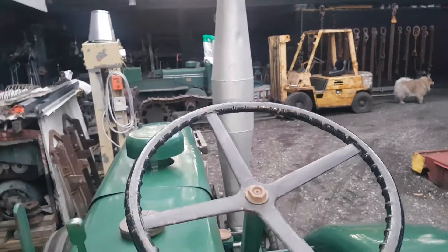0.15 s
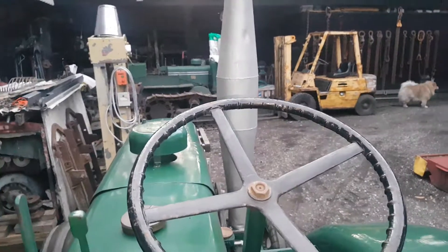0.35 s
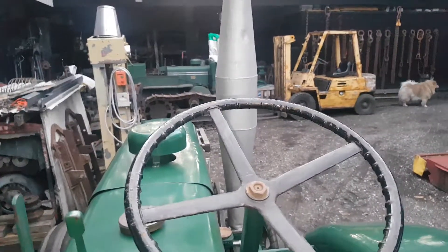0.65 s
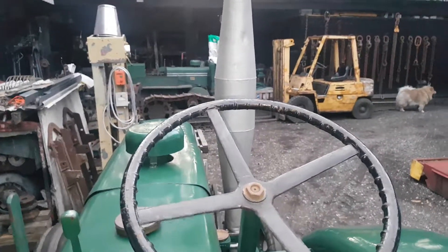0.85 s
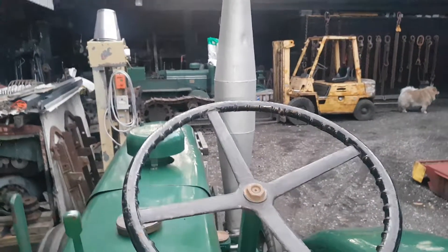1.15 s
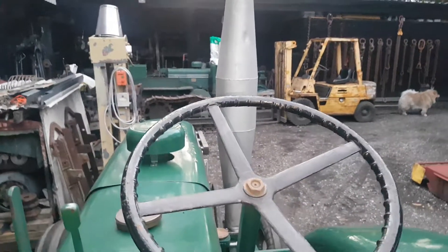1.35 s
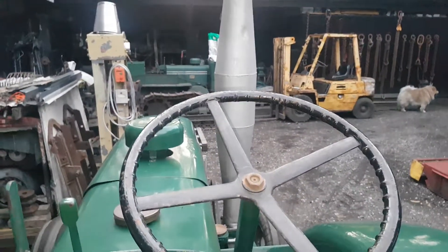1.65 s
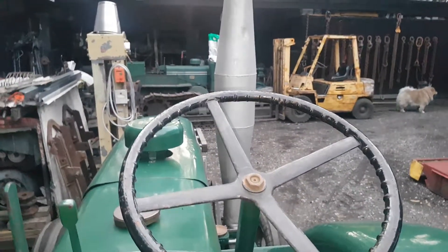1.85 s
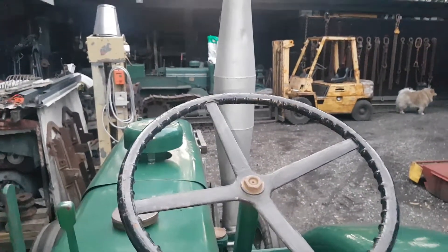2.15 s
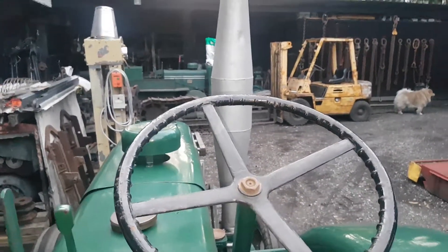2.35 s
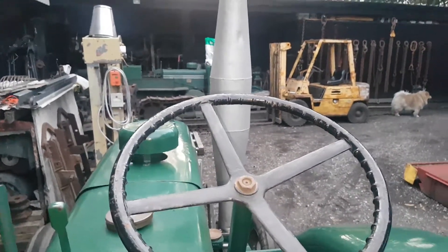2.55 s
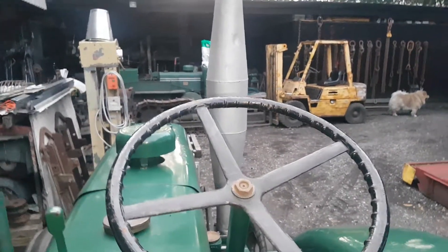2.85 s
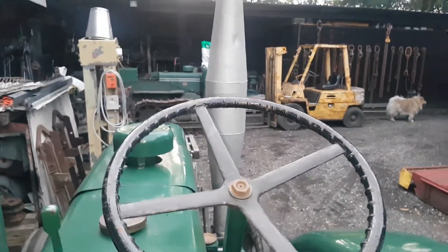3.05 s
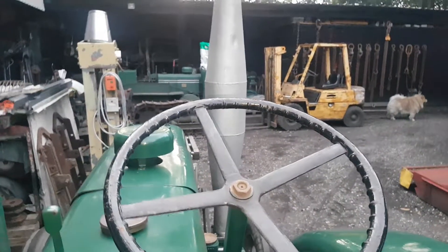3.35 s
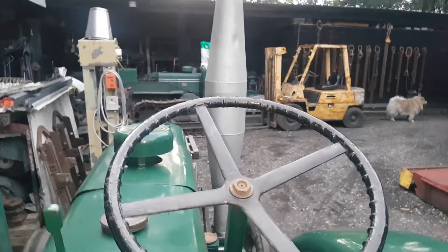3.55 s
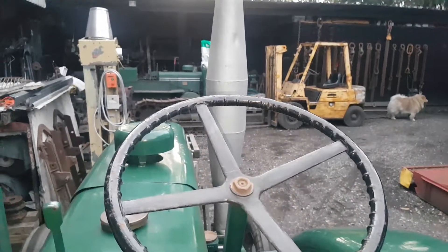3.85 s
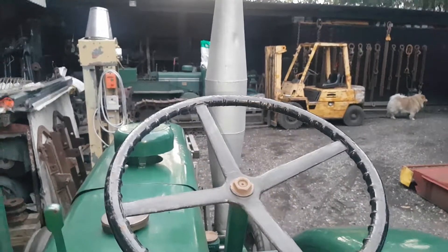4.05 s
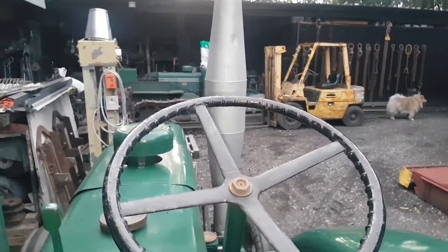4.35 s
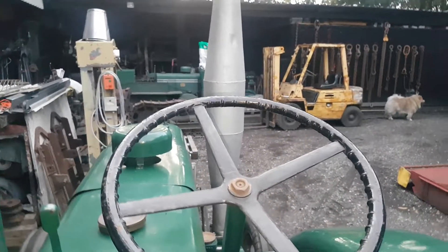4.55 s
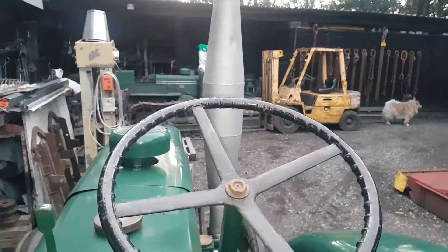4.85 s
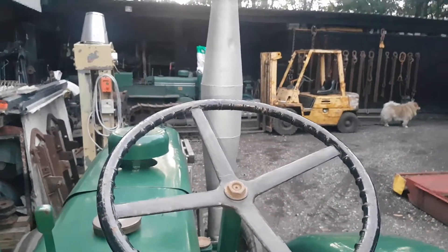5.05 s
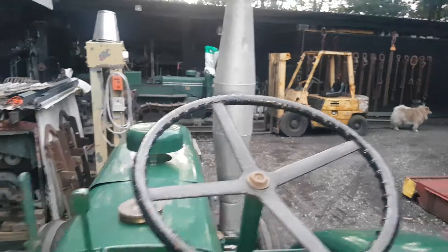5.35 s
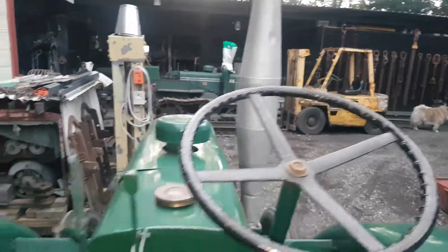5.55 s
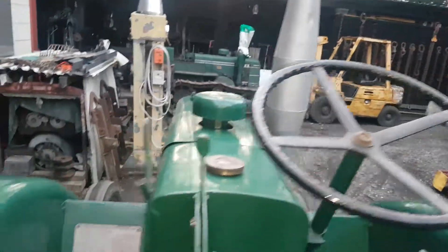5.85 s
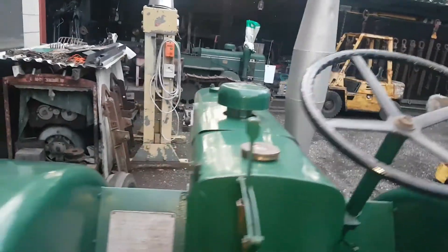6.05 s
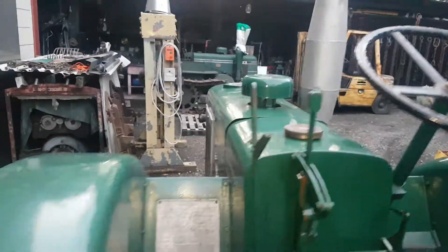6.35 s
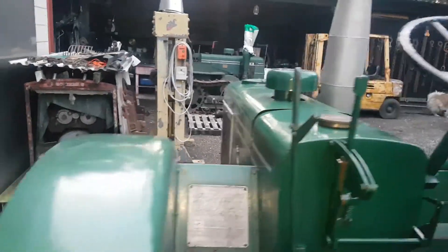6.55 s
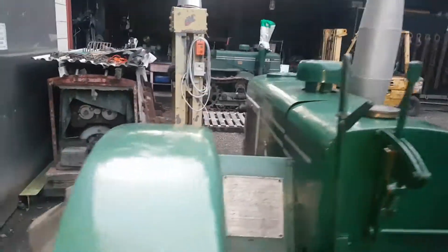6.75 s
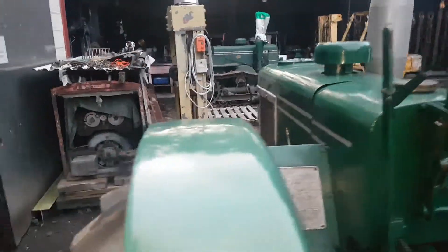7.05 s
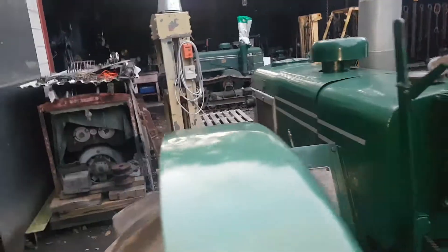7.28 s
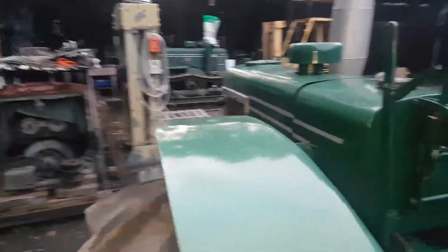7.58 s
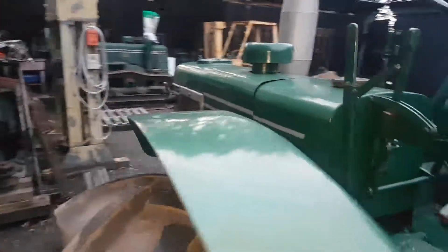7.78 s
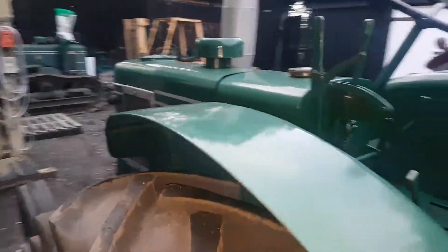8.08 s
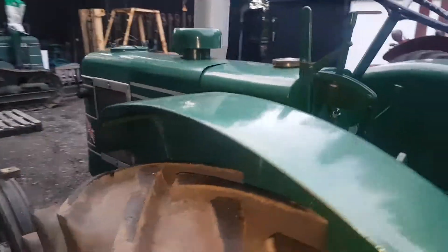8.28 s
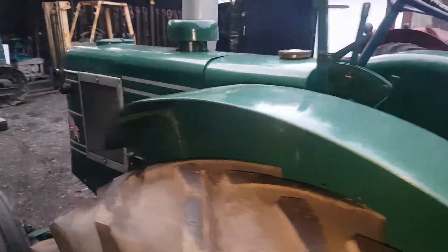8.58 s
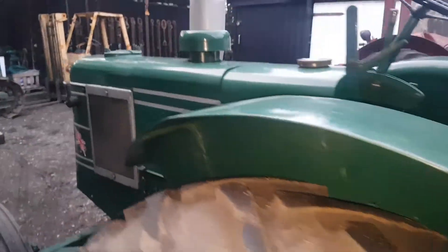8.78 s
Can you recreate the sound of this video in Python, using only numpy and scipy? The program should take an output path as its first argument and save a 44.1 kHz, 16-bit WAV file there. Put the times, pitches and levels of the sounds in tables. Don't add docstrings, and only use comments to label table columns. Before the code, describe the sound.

From 0 to 9 seconds a single-cylinder diesel tractor runs at a brisk steady tick-over, already going at the start and still going at the end. Roughly 8 thumps a second, quickening very slightly, leave the exhaust stack as deep, hollow pulses around 100 to 300 Hz. Just before each thump, valve gear knocks and chatters, a tiny whistle chirps near 1 kHz, and turbulent gas puffs with bright hiss; a thin, high squeak comes and goes. Until about 5.5 seconds the view from the seat is constant, with small tinny ticks near 1 and 2.9. From 5.5 to 8 the listener moves to the rear wheel: the thump loses weight, the whistle dims, level and colour waver. From 8 to 9, beside the wheel, rush and clatter are rougher, with short sheet-metal buzzes. Close small stereo microphone, slightly overloaded, brighter right, in a yard.

```python
import sys
import numpy as np
from scipy import signal
from scipy.fft import rfft, irfft, next_fast_len
from scipy.io import wavfile
from scipy.ndimage import uniform_filter1d

SR = 44100
rng = np.random.default_rng(int(sys.argv[2]) if len(sys.argv) > 2 else 0)


def how_loud(loudness_db):
    steps = np.asarray(loudness_db, float) / 20
    return 10 ** steps


def digitize_waveform(pressure):
    field = np.atleast_2d(pressure).T
    bounded = np.clip(field, -1, 1)
    quanta = np.round(bounded * 32767).astype(np.int16)
    wavfile.write(sys.argv[1], SR, quanta)


N = 393372

# f/Hz, density/(dB per Hz)
RUSH_SPECTRUM = [(150, -13.5), (300, -9.5), (500, -18), (800, -19.5), (1150, -20.5), (1400, -26),
                 (2500, -35.5), (2950, -38.5), (4600, -41.5), (5300, -46), (7500, -44), (9000, -61),
                 (10500, -58), (15500, -52)]
# f/Hz, gain/dB
WHEEL_COLOUR = [(200, 0.5), (300, 0.2), (550, -3), (1100, 7.5), (1500, -1.3), (2400, 1.7), (3500, -1.5),
                (5500, 2.5), (8500, -2.2), (13000, 1.5)]
# start/cycle from the thump, decay/cycle, peak/dB, centre f/Hz, reach/octave
GAS_GUSTS = [(-.42, .1, 1.5, 550, 0.88), (-.34, .12, 5.5, 1480, 1.3), (-.2, 0.045, 5, 4000, 5.1),
             (-.13, 0.13, 9, 250, 0.93), (-.43, 0.17, 2, 12100, 1.1), (.09, 0.18, 4, 298, 2.1),
             (.1, .06, 2.5, 3300, 0.72), (.41, 0.036, -1, 10500, 0.51)]
VALVE_OPEN_DB = 4
FIRING_HZ = 8.27
LOCKED_UP_TO = 17


def in_time(rows):
    s, *columns = np.transpose(rows)
    return [np.interp(np.arange(N) / SR, s, c) for c in columns]


def at_hz(points, hz):
    return np.interp(np.log(hz), np.log(np.array(points)[:, 0]), np.array(points)[:, 1])


def drift(rate):
    r = np.exp(-80 * np.pi * rate / SR)
    slow = signal.lfilter([1], [1, -2 * r, r * r], rng.standard_normal(N // 40 + 4002))[4000:]
    return np.interp(np.arange(N) / 40, np.arange(len(slow)), slow / slow.std())


def shaped(x, gain):
    pad = 8192
    size = next_fast_len(N + 2 * pad)
    wide = np.pad(x, [(0, 0)] * (x.ndim - 1) + [(pad, pad)], mode="reflect")
    response = gain(np.maximum(np.fft.rfftfreq(size, 1 / SR), 1))
    return irfft(rfft(wide, size) * response, size)[..., pad:pad + N]


def swell(turn, hz, gusts, open_db=0):
    valve_opens, open_for, attack = -0.45, 0.65, .025
    share = np.arange(256) / 256
    opened = (share - valve_opens) % 1
    db = open_db * (1 - np.exp(-opened / attack)) * np.exp(-(opened / open_for) ** 8)
    db = db / (1 + (350 / hz) ** 4)
    for start, decay, peak_db, centre_hz, octaves in gusts:
        age = (share - start) % 1
        distance = np.log2(hz / centre_hz) / octaves
        db = db + peak_db * (1 - np.exp(-age / attack)) * np.exp(-age / decay - distance ** 2)
    return np.interp(turn % 1, share, db - db.mean(), period=1)


def squeak(turn, way):
    squeak_hz, squeak_db, scatter_db = 11000, -57.5, 4.5
    squeak_at, length = -0.38, .14
    band = signal.butter(2, [.965 * squeak_hz, 1.035 * squeak_hz], "band", fs=SR, output="sos")
    hiss = signal.sosfilt(band, rng.standard_normal((2, N)))
    place = turn - squeak_at + .5
    each_db = scatter_db * rng.standard_normal(80)[np.floor(place + 1).astype(int)]
    stroke = np.exp(-((place % 1 - .5) / length) ** 2)
    return how_loud(squeak_db + each_db - 18 * np.clip(way, 0, 1)) * stroke * hiss / hiss.std()


def tinwork():
    # t/s, peak level/dB, f/Hz, length/s
    rattles = [(.955, -46, 8200, .012), (2.852, -34, 4900, .013), (2.85, -45, 7400, .013),
               (6.23, -37, 3600, .004), (6.46, -41, 3600, .005), (7.886, -38, 4500, .005),
               (6.9, -39, 4200, .008), (6.94, -39, 4200, .008), (8.425, -30, 2400, .011),
               (8.545, -31, 2400, .009), (8.54, -45, 6600, .009), (8.78, -41, 5200, .015),
               (8.886, -40, 6200, .012), (8.902, -34, 2900, .009)]
    out, t = np.zeros((2, N)), np.arange(N) / SR
    for s, db, hz, length in rattles:
        band = signal.butter(2, [0.94 * hz, 1.07 * hz], "band", fs=SR, output="sos")
        buzz = signal.sosfilt(band, rng.standard_normal((2, N)))
        out += how_loud(db) * buzz / buzz.std() * np.exp(-((t - s) / length) ** 2)
    return out


def clatter(turn, level_db, way, per_s=900, cycles=45, depth=1.7):
    out = np.zeros((2, N))
    busy = how_loud(depth * swell(turn, 2000, GAS_GUSTS, VALVE_OPEN_DB))
    born = (rng.random(N) < per_s * busy / SR) * how_loud(5.7 * np.minimum(rng.exponential(1, N), 3))
    born = born * rng.choice([-1, 1], N)
    pitches, dealt = np.geomspace(1100, 7600, 26), rng.integers(0, 26, N)
    sides = how_loud(2 * rng.standard_normal((2, N)))
    for k, hz in enumerate(pitches):
        r, w = how_loud(-60 * hz / (cycles * SR)), 2 * np.pi * hz / SR
        gain = how_loud(at_hz(RUSH_SPECTRUM, hz) + at_hz(WHEEL_COLOUR, hz) * way) * np.sqrt(hz / 1000)
        strikes = sides * born * (dealt == k) + 1e-18
        out += gain * signal.lfilter([0, np.sin(w)], [1, -2 * r * np.cos(w), r * r], strikes)
    return how_loud(level_db - 36.5) * out / out.std()


def valve_gear(turn, level_db):
    # time/cycle from the thump, level/dB, brightness/(dB per octave), scatter/dB
    contacts = [(-.405, -10, -2.5, 1.8), (-.33, -15.5, 0, 1.5), (-.26, -17, 2.5, 2), (-.19, -15, 2.5, 2.5),
                (-.1, -20.5, -1, 2), (.26, -33, 5.5, 3.5)]
    # f/Hz, level/dB, t60/s
    casing_modes = [(509, -3, 0.035), (575, -6, 0.025), (782, -9, 0.061), (1214, 1.5, 0.007),
                    (1767, -21, 0.038), (2078, -15, 0.03), (2456, -16.5, 0.035), (3160, -44.5, 0.005),
                    (4930, -23, 0.0075), (7480, -28.5, 0.02)]
    out = np.zeros((2, N))
    hits = [np.flatnonzero(np.diff(np.floor(turn - row[0]))) for row in contacts]
    shifts = [rng.normal(0, .0006 * SR, len(h)).astype(int) for h in hits]
    ticks = (rng.random(N) < 140 / SR) * how_loud(-27 + 4 * np.minimum(rng.exponential(1, N), 2.5))
    for hz, mode_db, t60 in casing_modes:
        clicks = ticks * rng.standard_normal((2, N)) * (rng.random(N) < .4) + 1e-18
        for at, shift, (share, db, tilt, scatter_db) in zip(hits, shifts, contacts):
            scatter = scatter_db * rng.standard_normal((2, len(at)))
            strength = how_loud(db + tilt * np.log2(hz / 800) + scatter)
            spread = rng.integers(0, .001 * SR, len(at))
            clicks[:, np.clip(at + shift + spread, 0, N - 1)] += strength * rng.choice([-1, 1])
        r, w = how_loud(-60 / (t60 * SR)), 2 * np.pi * hz / SR
        out += signal.lfilter([0, how_loud(mode_db) * np.sin(w)], [1, -2 * r * np.cos(w), r * r], clicks)
    soft = signal.butter(4, 6500, fs=SR, output="sos")
    return signal.sosfilt(soft, out) * how_loud(level_db)


def whistle(turn, way):
    rest_hz, hz_per_firing_hz = 1018.5, 130
    whistle_db, shadow_db, lead_s = -10.7, 5.5, .0175
    firing_hz = uniform_filter1d(np.gradient(turn) * SR, size=SR)
    hz = rest_hz + hz_per_firing_hz * (firing_hz - FIRING_HZ)
    level_db = whistle_db - shadow_db * np.clip(13.5 * (way - .2), 0, 1)
    out = np.zeros(N)
    thumps = np.flatnonzero(np.diff(np.floor(turn)))
    age = np.arange(-.02 * SR, .012 * SR) / SR
    shape = np.where(age < 0, np.exp(-(age / 0.0055) ** 2), np.exp(-(age / 0.007) ** 2))
    for at, (a, b, c, d) in zip(thumps, rng.standard_normal((len(thumps), 4))):
        idx = np.clip((at + (age - lead_s - .003 + 0.001 * a) * SR).astype(int), 0, N - 1)
        phase = 2 * np.pi * (hz[at] + 9 * b) * age + np.pi * c
        out[idx] += how_loud(level_db[at] + 0.78 * d) * shape * (np.sin(phase) + 0.026 * np.cos(2 * phase))
    return out * how_loud(1.5 * drift(150))


def ringing(hz, echo_db=-21, count=14):
    # f/Hz, width/Hz, level/dB
    stack_modes = [(240.3, 14, 5.5), (310.2, 25, 4), (409, 50, 2.5), (500, 18, 6.5), (620, 22, 2.5),
                   (756, 18, 5), (969, 51, 7), (1710, 360, 4), (2100, 69, 2.5), (2293, 170, 3.5)]
    peaks_db = sum(db / (1 + ((hz - centre) * 2 / width) ** 2) for centre, width, db in stack_modes)
    lags = rng.uniform(0.001044, .022, (count, 2, 1))
    echoes = sum(np.exp(-2j * np.pi * hz * lag) * how_loud(-300 * lag) for lag in lags)
    return how_loud(peaks_db) * (1 + how_loud(echo_db) * echoes * np.clip(hz / 1500, 0, 1))


def rush(turn, way, low_db, depth=1.08, flutter_db=0.86, patchy_db=0.98):
    # f/Hz, correlation/1
    likeness = [(60, 0.39), (180, 0.91), (550, 0.75), (1650, 0.048), (4970, 0.01), (15000, 0.01)]
    # start/cycle, decay/cycle,
    # peak/dB, centre f/Hz, reach/octave
    flank_bursts = [(-.29, 0.059, 5, 2520, .7), (-.02, .12, 3, 260, .6)]
    each_cycle = rng.normal(0, 0.37, 80)[np.floor(turn + 1.45).astype(int)]
    together = uniform_filter1d(each_cycle, size=400) + flutter_db * drift(31)
    out = np.zeros((2, N))
    centres = 80 * 2 ** np.arange(0, 8, 2 / 3)
    size = next_fast_len(N)
    octave = np.log2(np.maximum(np.fft.rfftfreq(size, 1 / SR), 1))
    white = rfft(rng.standard_normal((2, 2, size)))
    for i, hz in enumerate(centres):
        window = np.cos(np.pi / 2 * np.clip((octave - np.log2(hz)) * 3 / 2, -1, 1))
        mid, side = irfft(white[i % 2] * window, size)[:, :N]
        alike = np.clip(at_hz(likeness, hz), 0, .99)
        db = (depth + 0.037 * way) * swell(turn, hz, GAS_GUSTS, VALVE_OPEN_DB)
        db = db + np.clip(way - .5, 0, 1) * swell(turn, hz, flank_bursts)
        db = db + low_db / (1 + (hz / 420) ** 4)
        db = db + way * at_hz(WHEEL_COLOUR, hz)
        gain = how_loud(db + together * min(1, hz / 700) + patchy_db * drift(18.0))
        out += gain * (np.sqrt(1 + alike) * mid + np.sqrt(1 - alike) * side * [[1], [-1]])
    out = shaped(out, lambda hz: ringing(hz) * how_loud(at_hz(RUSH_SPECTRUM, hz)) / (1 + (150 / hz) ** 4))
    return how_loud(-17.5) * out / out.std()


def exhaust_orders():
    seat_orders = [-52, -41, -39.5, -30.5, -34, -28, -23.5, -33.5, -24, -15, -24.5, -14.5, -22.5, -22.5,
                   -19.5]
    wheel_orders = [-50, -37.5, -39.5, -26, -29.5, -25.5, -28, -32.5, -26.5, -19.5, -34, -16.5, -22.5,
                    -30.5, -27]
    # f/Hz, width/Hz, level at the seat/dB, level beside the wheel/dB
    pipe_modes = [(158.8, 22, -26, -37.5), (181.6, 19.4, -25, -30.5), (206.2, 26.6, -25, -34.5),
                  (249.6, 16.5, -32, -25.5), (283, 16, -28.5, -33.5)]
    top_order = 35
    k = np.arange(LOCKED_UP_TO + 1, top_order)
    hz, width, *tops_db = np.transpose(pipe_modes)
    shape = 1 / (1 + ((k[:, None] * FIRING_HZ - hz) * 2 / width) ** 2) ** 2
    seat_db, wheel_db = [10 * np.log10(shape @ how_loud(2 * db)) for db in tops_db]
    return zip(range(3, top_order), [*seat_orders, *seat_db], [*wheel_orders, *wheel_db])


def thump(turn, level_db, way, deep_db):
    inverted, late_up_to = 16, 9
    pipe_note, lag_above_note = 14, .55
    ground_lead, ground_up_to = .8, 6
    wall_cancels = 8
    upper_crest, crest_later_beside = -0.0846, 0.0533
    out = np.zeros(N)
    for k, seat_db, wheel_db in exhaust_orders():
        loose = k > LOCKED_UP_TO
        phase = np.pi * (k == inverted) - np.pi / 2 * (k - .6) * (k <= late_up_to)
        phase -= lag_above_note * max(k - pipe_note, 0) * (not loose)
        phase += ground_lead * (k <= ground_up_to)
        phase += loose * np.pi + (.12 + .45 * loose) * drift(.3)
        crest = upper_crest + crest_later_beside * way if loose else -.02
        order_db = seat_db + way * (wheel_db - seat_db)
        gain = how_loud(order_db + (.7 + 1.5 * loose) * drift(.8) + .9 * drift(3))
        gain = gain * how_loud(deep_db * (k <= late_up_to))
        if k == wall_cancels:
            gain = gain * np.cos(np.pi * way)
        out -= gain * np.cos(2 * np.pi * k * (turn - crest) + phase)
    return out * how_loud(level_db)


def scene():
    # t/s, thumps counted so far/1
    crank = [(-0.0041, -1.0), (1.1157, 8.0), (2.1031, 16.0), (3.0826, 24.0), (4.0543, 32.0), (5.0185, 40.0),
             (5.9755, 48.0), (6.9225, 56.0), (7.8635, 64.0), (8.8055, 72.0), (9.0408, 74.0)]
    # t/s, level/dB
    gain_ride = [(0, -1), (.5, -0.5), (1, -.5), (1.25, -2.5), (1.5, -0.8), (2.5, -0.14), (3.5, 0),
                 (4.5, -0.46), (5.5, 0.5), (5.95, -1.5), (6.3, -0.7), (6.6, -0.5), (6.95, 0.8), (7.25, 0.5),
                 (7.6, -2), (8.0, -1), (8.45, 0.5), (8.92, 1)]
    # t/s, share of the way from seat to wheel/1 (over 1 = toward the engine), extra path from the stack/m
    walk = [(0, 0.051, 0.041), (3, 0.027, .06), (5.5, 0.205, 0.11), (6.4, 0.295, 0.62), (7.2, 0.63, 1.03),
            (7.9, 0.29, 1.63), (8.2, 1.06, 1.55), (8.92, 1, 1.7)]
    left_leads_s, thump_loss_db_per_m = .00028, 1.6
    wall_wave_m, wall_swing_db = 3.1, 3
    low_rush_db_per_m = 2.5
    turn, = in_time(crank)
    level_db, = in_time(gain_ride)
    way, path_m = in_time(walk)
    late_turn = turn - path_m / 343 * np.gradient(turn) * SR
    upper = rush(late_turn, way, low_rush_db_per_m * path_m)
    upper = upper + whistle(late_turn, way) + valve_gear(late_turn, -1.6)
    upper += clatter(late_turn, -1.1, way) + tinwork() + squeak(late_turn, way)
    treble = shaped(upper[1], lambda hz: 1 / (1 + (900 / hz) ** 4))
    upper[1] += np.interp(np.arange(N) - left_leads_s * SR, np.arange(N), treble) - treble
    deep_db = -wall_swing_db * np.sin(2 * np.pi * path_m / wall_wave_m)
    deep = thump(late_turn, .3 - thump_loss_db_per_m * path_m, np.clip(way, 0, 1), deep_db)
    return how_loud(level_db) * (upper + deep)


def low_pass(x):
    return signal.sosfilt(signal.butter(12, 15620, fs=SR, output="sos"), x)


def record(dry):
    # f/Hz, left minus right/dB
    port_tilt = [(30, -5), (70, -2.75), (180, -1.34), (450, -2.5), (1000, -10), (2000, -8), (4500, -6),
                 (12000, -8.5)]
    sides = np.array([[1], [-1]])
    x = shaped(dry, lambda hz: how_loud(at_hz(port_tilt, hz) / 2 * sides) / (1 + (28 / hz) ** 4))
    x = x / (1 + (abs(x) / 1.02) ** 4) ** (1 / 4)
    x = x * np.clip((N - np.arange(N)) / 300 + .35, 0, 1) * np.clip(np.arange(N) / 110, 0, 1)
    return low_pass(x)


dry = scene()
out = record(dry)
digitize_waveform(out)
```